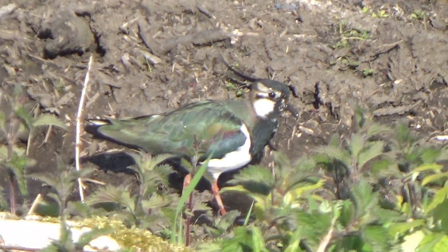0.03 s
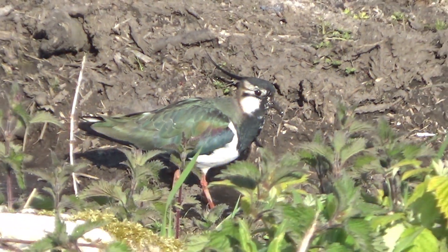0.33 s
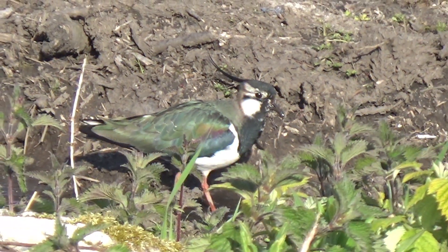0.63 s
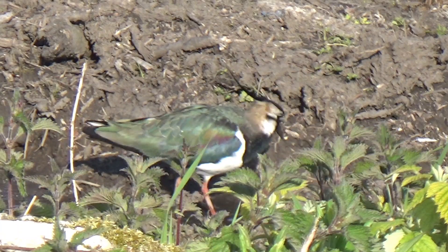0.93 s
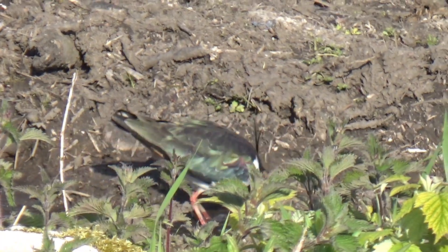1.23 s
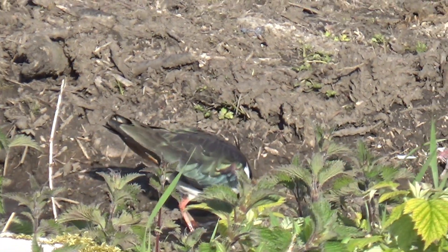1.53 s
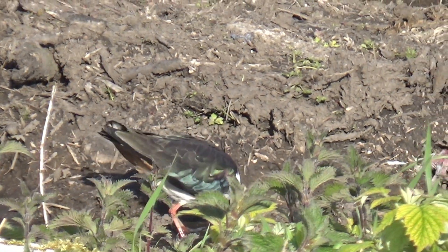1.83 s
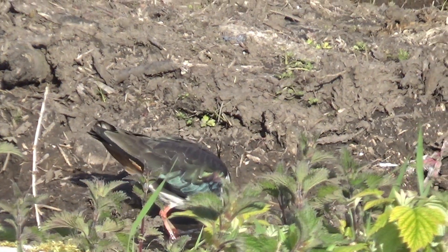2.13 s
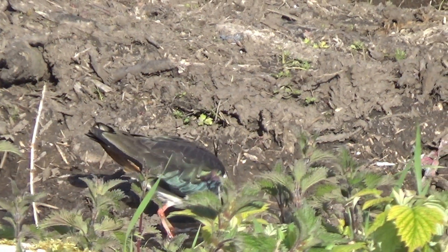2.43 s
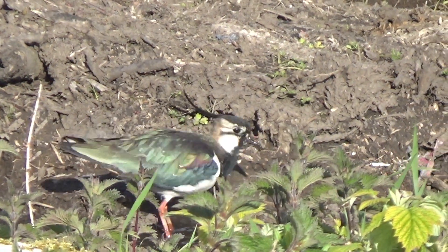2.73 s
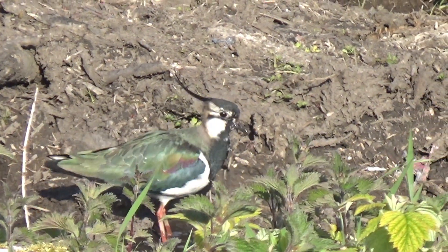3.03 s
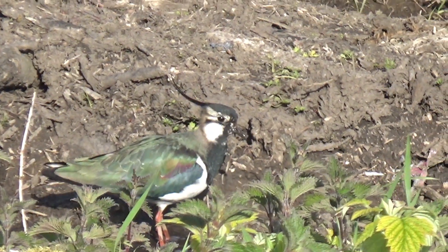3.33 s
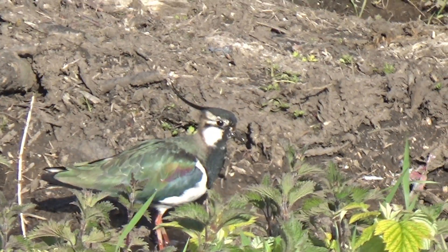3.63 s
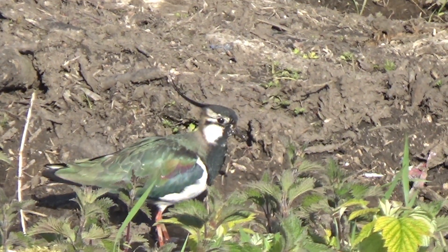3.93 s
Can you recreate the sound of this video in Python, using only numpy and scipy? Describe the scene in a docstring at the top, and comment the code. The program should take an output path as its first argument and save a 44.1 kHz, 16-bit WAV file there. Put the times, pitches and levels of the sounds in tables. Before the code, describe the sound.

Distant road traffic roars steadily for all four seconds, leaning left. Wind rumbles unevenly on the microphone, strongest around 0.3 and 0.9 seconds, then eases, with a brief return near 2.8 seconds. Faint camera handling clicks come at about 0.2, 0.9 and 2.5 seconds, with a small cluster around 3.6 to 3.7. Soft hiss and a barely audible high whine lie underneath.

```python
"""Breezy open ground

Tyres and engines on a distant road merge into a steady roar on the left.
Wind eddies rumble on the microphone of a hand-held camera, most in the first second.
Faint handling ticks ring the camera body over its own hiss and thin whine."""
import sys
import numpy as np
from scipy import signal
from scipy.fft import rfft, irfft
from scipy.io import wavfile

SR = 44100
rng = np.random.default_rng(int(sys.argv[2]) if len(sys.argv) > 2 else 0)


def log_audio(samples):
    """Write samples as a 16-bit WAV file to the path given in sys.argv[1]."""
    # one column per channel
    frames = np.atleast_2d(samples).T
    # limit to full scale, then quantise
    limited = np.clip(frames, -1, 1)
    pcm = np.round(limited * 32767).astype(np.int16)
    wavfile.write(sys.argv[1], SR, pcm)


N = 176400


def from_db(db):
    """Decibels to gain."""
    return 10 ** (np.asarray(db) / 20)


def unit_rms(x):
    """Scale to rms 1."""
    return x / np.sqrt(np.mean(x ** 2) + 1e-20)


def in_time(rows):
    """Interpolate (t/s, value) rows at every sample."""
    return np.interp(np.arange(N) / SR, *np.transpose(rows))


def at_hz(rows, hz):
    """Interpolate (f/Hz, value) rows on a log-frequency axis."""
    row_hz, values = np.transpose(rows)
    return np.interp(np.log(np.maximum(hz, 1)), np.log(row_hz), values)


def pan_gains(pan_db):
    """Constant-power left and right gains for an L-R level difference."""
    gains = from_db(np.array([[.5], [-.5]]) * pan_db)
    return gains / np.sqrt(np.mean(gains ** 2, axis=0))


def drift(corner_hz):
    """Slow random curve, mean 0, rms 1."""
    hz = np.fft.rfftfreq(N, 1 / SR)
    white = rfft(rng.standard_normal(N))
    return unit_rms(irfft(white * (hz > 0) / (1 + (hz / corner_hz) ** 2), N))


def stereo_noise(spectrum, coherence, pan=((1, 0),)):
    """Noise of given spectral shape, L-R coherence and pan; rms 1."""
    hz = np.fft.rfftfreq(N, 1 / SR)
    mid, side = rfft(rng.standard_normal((2, N)))
    alike = np.clip(at_hz(coherence, hz), -1, 1)
    pair = np.sqrt(1 + alike) * mid + np.sqrt(1 - alike) * side * [[1], [-1]]
    shaped = pair * from_db(at_hz(spectrum, hz)) * (hz > 10)
    return unit_rms(irfft(shaped * pan_gains(at_hz(pan, hz)), N))


def microphone_hiss(level_db=-61.5):
    """Steady self-noise of the microphone."""
    # hiss spectrum: f/Hz, relative density/dB
    spectrum = [(2000,-1),(4000,-6),(4900,-4),(6200,0.5),(7500,-2),(10000,-5),(13000,-7),(16000,-9.5)]
    # stereo likeness: f/Hz, coherence
    coherence = [(4000,1),(6400,0.8),(15000,0.94)]
    return from_db(level_db) * stereo_noise(spectrum, coherence)


def camera_whine(waver_db=2.5, waver_hz=14):
    """Two thin wavering tones that fade out briefly near the end."""
    # whine tones: f/Hz, rms level/dB
    tones = [(13119,-76),(13248,-79)]
    # whine envelope: t/s, gain/dB
    envelope = [(0,1),(.6,-2),(1.15,1),(2.3,-.5),(3.08,-3),(3.14,-16),(3.52,-16),(3.6,-4),(4,-1)]
    t = np.arange(N) / SR
    whine = np.zeros(N)
    for hz, db in tones:
        amplitude = np.sqrt(2) * from_db(db + waver_db * drift(waver_hz))
        whine += amplitude * np.sin(2 * np.pi * hz * t)
    return from_db(in_time(envelope)) * whine


def handling_ticks():
    """Each tick is a tiny decaying slip that rings the camera body."""
    # body resonances: f/Hz, bandwidth/Hz
    resonances = [(2600,1400),(3350,650),(6300,1500),(7700,2100),(12500,2200)]
    # slips: t/s, length/s, then peak level/dB in each resonance
    slips = [(0.169,.004,-43,-45,-43.5,-46,-48),(.571,.004,-66,-66,-66,-58,-48),(.9402,.0004,-66,-66,-36,-34,-44),(2.492,0.0033,-60,-37,-64,-68,-70),(3.582,.0005,-41,-43,-47,-51,-64),(3.586,.001,-51,-46,-52,-58,-68),(3.692,0.0015,-43,-54,-66,-58,-68),(3.733,.001,-51,-53,-60,-46,-62)]
    ticks = np.zeros(N + SR)
    t = np.arange(SR // 20) / SR
    for start_s, length_s, *peaks_db in slips:
        start = int(start_s * SR)
        slip = rng.standard_normal(len(t)) * np.sqrt(t) * np.exp(-2 * t / length_s)
        for (hz, width_hz), db in zip(resonances, peaks_db):
            band = signal.butter(2, [hz - width_hz / 2, hz + width_hz / 2], "band", fs=SR, output="sos")
            ring = signal.sosfilt(band, signal.sosfilt(band, slip))
            ticks[start:start + len(t)] += from_db(db) * ring / np.abs(ring).max()
    return ticks[:N]


def distant_road(base_db=-35.5, waver_db=0.68, waver_hz=8):
    """Far tyres and engines merge into a roar that wavers in moving air, with a faint swish on top."""
    # tyre roar over a low rumble: f/Hz, relative density/dB
    roar_spectrum = [(25,-16),(50,0),(90,1),(150,1),(250,-5),(360,-13),(520,-9.5),(660,-4),(790,1),(1020,0.5),(1230,-6),(1520,-9.5),(1820,-19),(2200,-26),(3000,-48),(5000,-65)]
    # brighter tyre swish: f/Hz, relative density/dB
    swish_spectrum = [(900,-22),(1600,0.5),(2100,1),(2450,-4),(2850,-10),(3400,-13.5),(4200,-21.5),(6000,-41)]
    # stereo likeness: f/Hz, coherence
    coherence = [(60,.99),(150,.92),(260,.89),(520,.9),(850,.96),(1350,.89),(2100,.98),(4000,.98)]
    # lean to the left: f/Hz, L-R/dB
    pan = [(40,9),(85,6.5),(140,13.5),(190,12),(250,10),(380,1.5),(500,5),(640,6),(820,5),(1180,10),(1650,3),(2000,1.2),(2800,3.5),(5000,-2)]
    # traffic swell: t/s, gain/dB
    swell = [(0,0.5),(.5,1.54),(1.0,1.3),(1.36,-0.95),(1.6,0.6),(2.2,-0.2),(2.9,0.1),(3.1,0.1),(3.4,-1.2),(4,-0.6)]
    # swish envelope: t/s, level/dB
    swish_envelope = [(0,-54.5),(.7,-54.5),(1.3,-54),(1.9,-53),(3,-53.5),(4,-53.3)]
    roar = stereo_noise(roar_spectrum, coherence, pan)
    swish = stereo_noise(swish_spectrum, coherence, pan)
    roar_db = base_db + in_time(swell) + waver_db * drift(waver_hz)
    return from_db(roar_db) * roar + from_db(in_time(swish_envelope)) * swish


def microphone_wind(lumps_db=1.5, lumps_hz=39, gust_edge_s=.03):
    """Eddies rumble in lumps on the microphone; the hardest gusts add a higher flutter."""
    # wind rumble: f/Hz, relative density/dB
    rumble_spectrum = [(20,-6),(35,-15.5),(60,0.5),(105,0.5),(160,-2.5),(230,-12.5),(350,-28.5),(600,-36),(1500,-65)]
    # gust flutter: f/Hz, relative density/dB
    flutter_spectrum = [(80,-5),(170,-1.5),(290,1),(420,-15),(600,-14),(1500,-61)]
    # stereo likeness: f/Hz, coherence
    coherence = [(60,.997),(120,.98),(250,.93)]
    # lean to the left: f/Hz, L-R/dB
    pan = [(60,-1),(110,0.5),(160,1.5),(240,6.5),(330,5),(500,5)]
    # rumble envelope: t/s, level/dB
    envelope = [(0,-31.5),(.09,-39.5),(.22,-31),(.285,-36.5),(.345,-27),(.4,-35),(.45,-29.5),(.5,-34.5),(.6,-31.5),(.77,-40),(.85,-36),(.91,-26.5),(.99,-34),(1.05,-47),(1.17,-36.5),(1.24,-42.5),(1.37,-36),(1.53,-39),(1.66,-53),(1.93,-41),(2.15,-52.5),(2.62,-49),(2.68,-38),(2.74,-50),(2.82,-33),(2.92,-49),(4,-55)]
    # hardest gusts: t/s, length/s, level/dB
    gusts = [(0.28,0.075,-41.5),(0.876,.135,-32)]
    t = np.arange(N) / SR
    lumps = from_db(lumps_db * drift(lumps_hz))
    rumble = from_db(in_time(envelope)) * stereo_noise(rumble_spectrum, coherence, pan)
    gust_gain = np.zeros(N)
    for start_s, length_s, db in gusts:
        inside_s = np.minimum(t - start_s, start_s + length_s - t)
        gust_gain += from_db(db) * np.clip(inside_s / gust_edge_s + .5, 0, 1)
    flutter = gust_gain * stereo_noise(flutter_spectrum, coherence, pan)
    return lumps * (rumble + flutter)


def scene():
    """Road, wind and the camera's own small sounds."""
    return distant_road() + microphone_wind() + handling_ticks() + camera_whine() + microphone_hiss()


def record(dry):
    """Steep low-pass."""
    cutoff_hz, transition_hz = 15800, 200
    hz = np.fft.rfftfreq(N, 1 / SR)
    return irfft(rfft(dry) * np.clip((cutoff_hz - hz) / transition_hz + .5, 0, 1), N)


dry = scene()
out = record(dry)
log_audio(out)
```